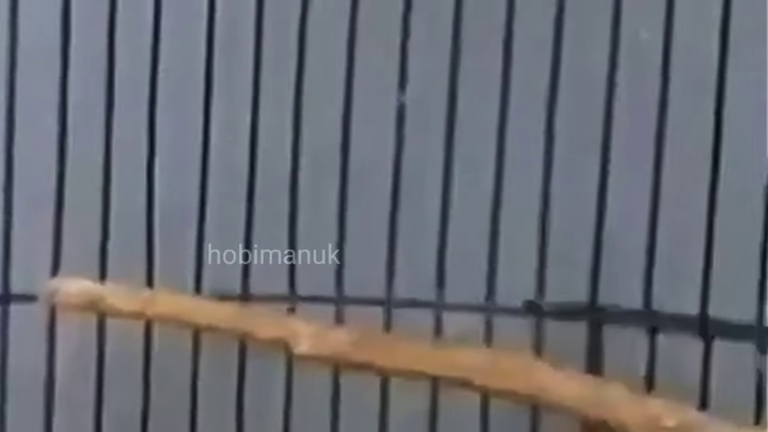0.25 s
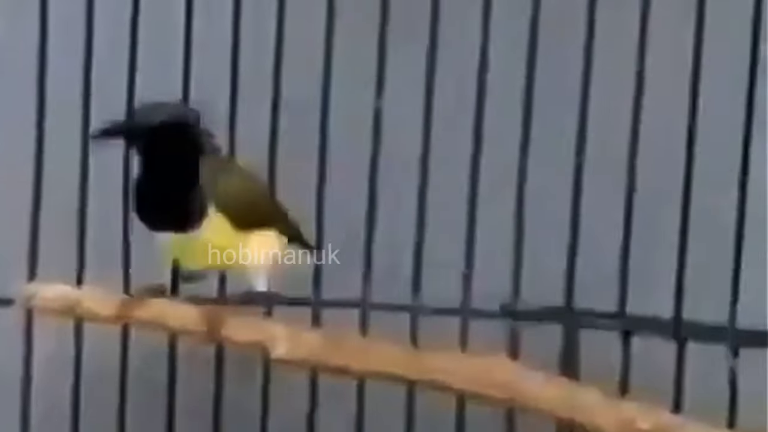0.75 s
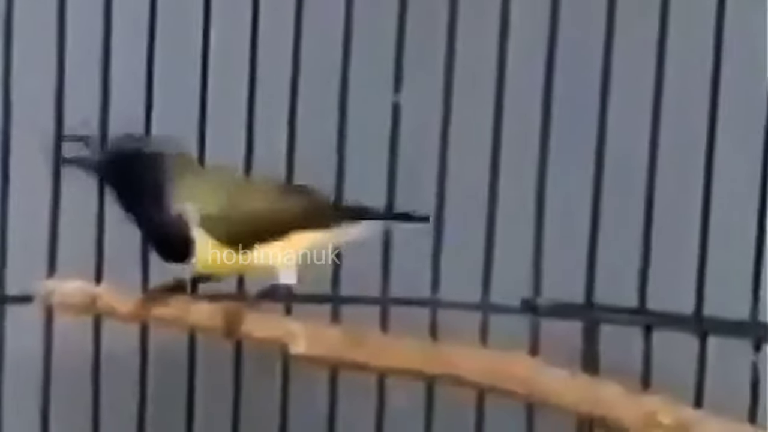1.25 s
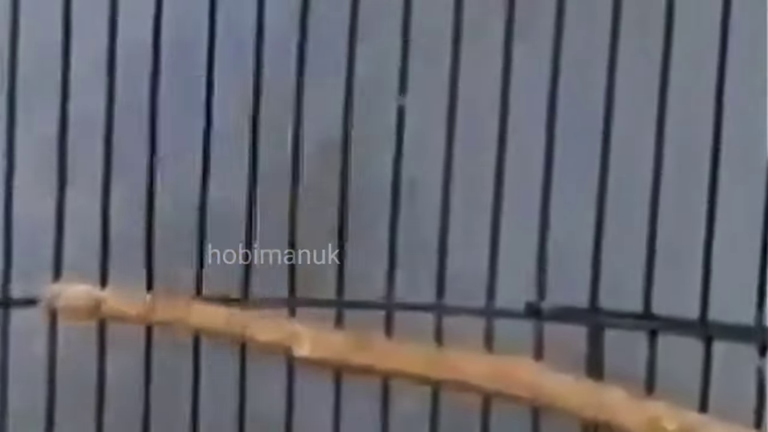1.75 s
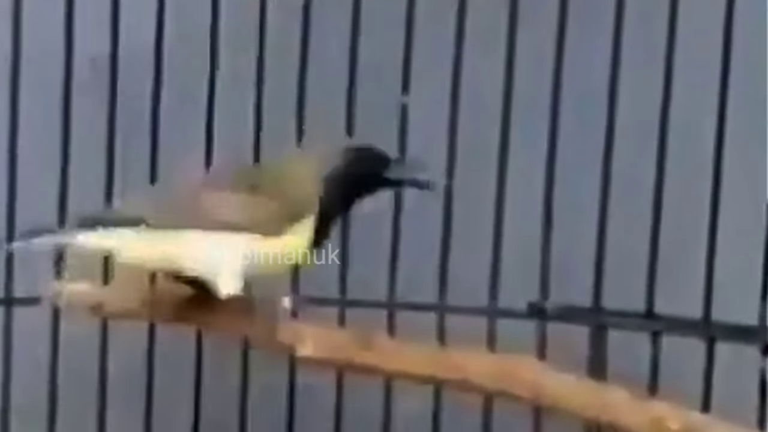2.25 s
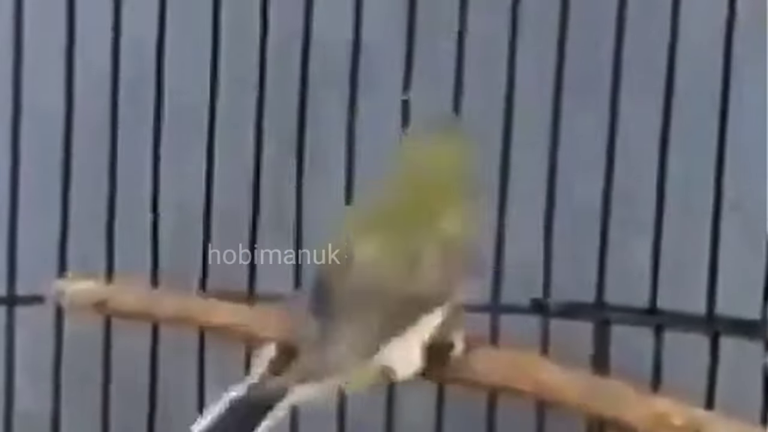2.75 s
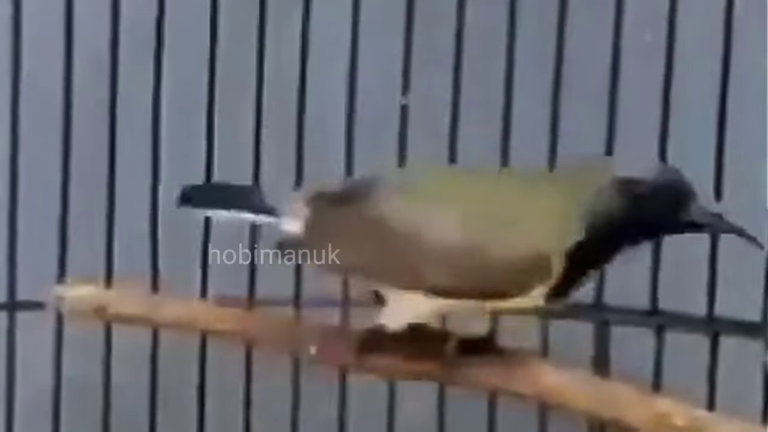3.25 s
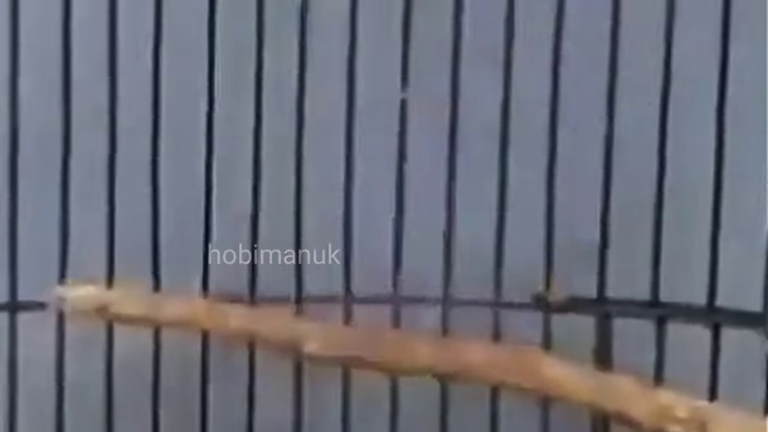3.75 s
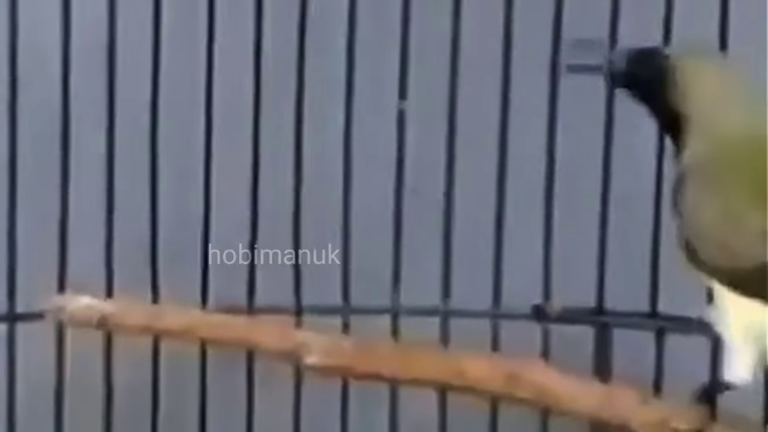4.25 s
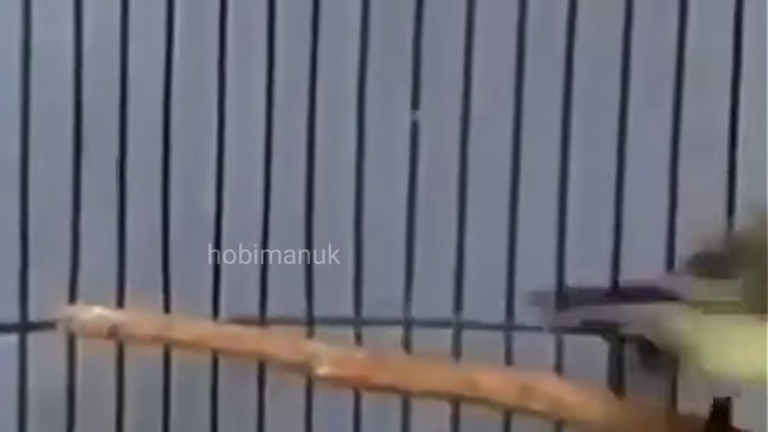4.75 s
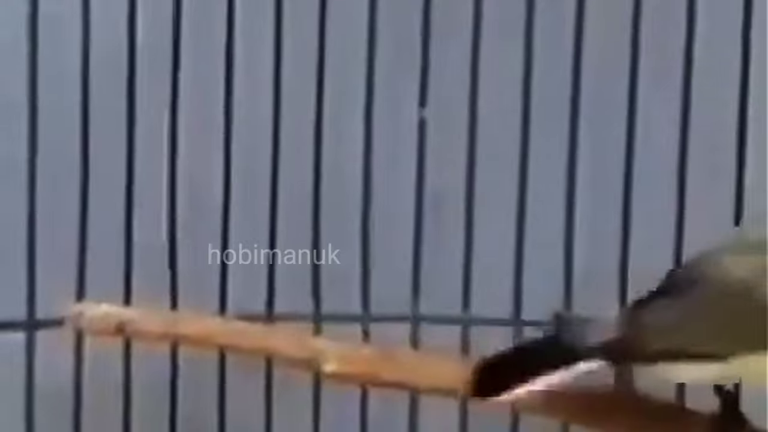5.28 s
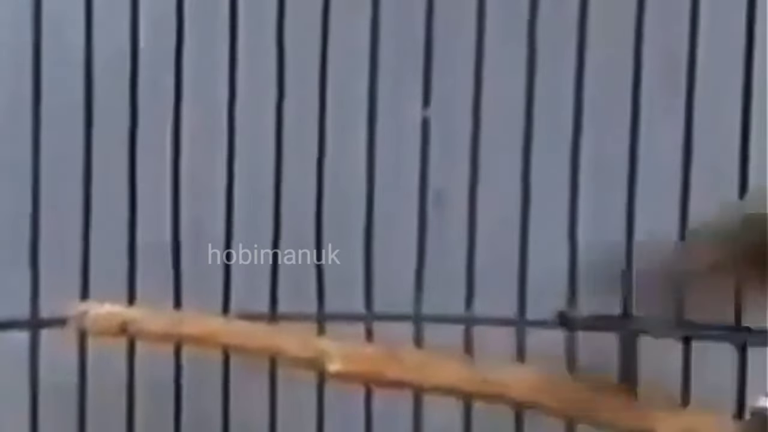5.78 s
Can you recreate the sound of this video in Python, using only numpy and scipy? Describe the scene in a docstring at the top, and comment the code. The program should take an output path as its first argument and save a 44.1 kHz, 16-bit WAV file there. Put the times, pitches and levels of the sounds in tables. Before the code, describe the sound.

A small caged sunbird sings close to the microphone in a hard-walled room, over low rumble, faint hum and light hiss. A wing whirr and faint rasp open at 0 s, then hoarse rasps and clear pips tumble together until about 0.6, loudest near 0.35. A sharp rising chip comes at 1.1, a rasp at 1.5, then three quick chips from 1.6 to 1.85, a raspy warble at 1.9 and another chip at 2.05. At 2.55 and again, louder, at 3.1, rapid pips lead into a short arched trilled whistle. Soft wing puffs and claw taps on the perch surround these, notably around 2.4-3.1 and 4.1. From 3.3 distant birds whistle clearly, stepping downward until about 4; two echoing cascades of falling chirps come at 4.5 and 4.75. Single bright close chips ring out at 4.1, 5.0 and 5.8, among faint far chirps.

```python
"""A whirr of wings and a faint hoarse rasp come first, then a caged sunbird sings close to the microphone.
Its rasps, pips, arched whistles and sharp chips are near sines, shaken in pitch and roughened into chaos.
Its wings puff coloured noise, and its feet scrape noise onto a ringing perch as it hops about.
Further off, other birds whistle and chirp in plain sines, mostly heard through the echo of a hard-walled
room. Shaped noise and steady sines make a low rumble, a hum and a faint hiss underneath."""
import sys
import numpy as np
from scipy import signal
from scipy.fft import rfft, irfft
from scipy.io import wavfile
from scipy.ndimage import uniform_filter1d, minimum_filter1d, map_coordinates

SR = 44100
rng = np.random.default_rng(int(sys.argv[2]) if len(sys.argv) > 2 else 0)


def store_wav(level_fs):
    """Save 16-bit WAV to argv[1]."""
    pcm = np.round(np.clip(np.atleast_2d(level_fs), -1, 1) * 32767)
    wavfile.write(sys.argv[1], SR, pcm.T.astype(np.int16))


N = 265464
TIME = np.arange(N) / SR

# Song levels are set before echo and output gain; pitches before trill and jitter; roughness is capped at 1.
# hoarse rasps: (t/s, length/s, first f/Hz, middle f/Hz, last f/Hz, level/dB, crescendo/dB, roughness)
RASP_NOTES = [ (.001, 0.051, 2670, 3310, 2980, -30.5, -5, 0.47),
              (0.094, 0.083, 2097, 3730, 2864, -22, 3.5, 0.7),
              (0.228, 0.048, 4720, 3934, 3950, -25.5, 9, 0.94),
              (.319, 0.027, 4340, 5010, 4600, -8.5, 8, 0.5),
              (.328, 0.067, 3492, 4784, 5800, -7.5, 10, 0.78),
              (0.444, 0.033, 3410, 3730, 3150, -18.5, -8, 0.58),
              (0.52, 0.071, 4570, 4245, 4800, -20, 4.5, 1.1),
              (0.567, 0.048, 4900, 5404, 5040, -12.5, 1, 0.81),
              (1.482, 0.049, 3437, 3840, 3305, -20, -6, 0.9),
              (1.883, 0.095, 5366, 4965, 4650, -18.5, 0.5, 0.75),
              (2.545, 0.037, 4100, 3940, 4060, -28, 2, 0.86),
              (3.056, 0.044, 3610, 3860, 4010, -20.5, 9, 0.69), ]
# clear pips that snap onto a pitch; two overlap when both sides of the syrinx sound:
# (t/s, length/s, first f/Hz, held f/Hz, level/dB, roughness)
PIP_NOTES = [ (0.17, 0.014, 5800, 4900, -13.5, 0.1), (.257, 0.0085, 4370, 4870, -13.5, 0.78),
             (1.899, 0.0083, 5330, 5480, -10.5, 0.26), (1.912, 0.021, 4690, 4270, -14, 0),
             (1.914, 0.014, 6800, 6430, -8.5, 0.05), (1.935, .023, 4050, 5320, -8, 0.08),
             (2.567, .007, 4380, 4420, -12.5, 0), (2.581, 0.019, 5930, 4320, -11, 0.3),
             (2.599, 0.022, 6090, 5270, -17, 0.32), (3.089, 0.0087, 4870, 4120, 2.5, 0.27),
             (3.099, 0.02, 6860, 4590, -10, 0.37), (3.118, 0.023, 6860, 5180, -7.5, 0.25), ]
# arched, finely trilled whistles: (t/s, length/s, first f/Hz, middle f/Hz, last f/Hz, level/dB, crescendo/dB)
ARCH_NOTES = [(2.614, .098, 5530, 6290, 5760, -12, -4.5), (3.138, .134, 5380, 6460, 5240, -8, -6.5)]
# sharp rising chips: (t/s, length/s, first f/Hz, top f/Hz, level/dB, roughness)
CHIP_NOTES = [ (1.121, 0.057, 3535, 5540, -10.5, 0.78), (1.615, 0.05, 4150, 6070, -7.5, 0.91),
              (1.717, 0.047, 4190, 6230, -4.5, 0.76), (1.812, 0.048, 4100, 5965, -8, 0.79),
              (2.049, 0.065, 3650, 6140, -11.5, 1.02), (4.128, 0.051, 4204, 5630, -6.5, 0.71),
              (5.021, 0.051, 3850, 6014, -2, 0.65), (5.776, 0.057, 3560, 6500, -4, 0.63), ]
# balance let through by throat and open beak, before the note is levelled: (f/Hz, relative level/dB)
BEAK_RESPONSE = [(1400, -29), (2800, -8), (4000, -1.5), (5500, 9.5), (6600, 7), (7400, -16.5),
                 (9000, -20.5), (12000, -23)]
# colour of the turbulence in a rough note: (f/Hz, relative level/dB)
TURBULENCE_COLOUR = [(300, -28.5), (1200, -10.5), (2600, -7), (4500, 6), (6600, 3), (7500, -7),
                     (9000, -23.5), (12000, -32.5)]
# reflections from the cage tray and the wall behind it: (delay/s, level/dB)
NEAR_REFLECTIONS = [(.0013, -14), (.0034, -12), (.0071, -16), (.0118, -22)]

# bursts of wingbeats: (t/s, length/s, level/dB)
WING_BURSTS = [(0, 0.043, -26), (0.135, 0.078, -41), (0.37, 0.082, -33.5), (1.025, .15, -39.5),
               (2.251, 0.044, -38), (2.421, 0.058, -47.5), (2.538, 0.083, -43.5), (2.931, 0.067, -37),
               (3.06, 0.16, -38.5), (3.451, 0.032, -52), (4.064, 0.073, -32), (4.365, 0.075, -39)]
# colour of the air pushed by a wing: (f/Hz, relative level/dB)
WING_COLOUR = [(20, -4.5), (40, -14), (90, 5), (180, -14), (350, -19.5), (900, -25.5), (2500, -19),
               (7000, -30.5), (12000, -59)]
# feet on perch and bars: (t/s, level/dB)
FOOT_TAPS = [(0.031, -47), (.434, -37.5), (1.57, -44.5), (2.436, -42.5), (2.931, -39), (2.96, -35.5),
             (3.079, -34.5), (4.084, -33.5), (4.391, -44)]
# ringing modes of the perch in its cage: (f/Hz, relative level/dB, t60/s)
PERCH_MODES = [(620, 1, 0.015), (758, -12, 0.075), (960, 6.5, 0.012), (1218, 2, 0.013), (1820, -1.5, 0.02),
               (2966, -10, 0.009)]

# Levels of the distant birds are set before the direct and echo trims.
# pure whistles of a bird further off: (t/s, length/s, first f/Hz, held f/Hz, level/dB)
FAR_WHISTLES = [ (0.599, 0.079, 2145, 2136, -37.5), (0.673, 0.031, 2740, 2800, -44),
                (0.816, 0.048, 2104, 2410, -39.5), (0.894, .055, 2944, 2520, -41),
                (1.074, .089, 2173, 2088, -43.5), (1.409, 0.12, 2130, 2660, -45.5),
                (3.266, 0.036, 5680, 5620, -19), (3.281, 0.049, 2156, 2185, -41.5),
                (3.311, 0.087, 2856, 2660, -40.5), (3.356, 0.14, 4366, 4499, -14.5),
                (3.557, 0.13, 3646, 3502, -18.5), (3.743, 0.076, 2034, 2197, -41.5),
                (3.754, 0.15, 2948, 2845, -22), (3.916, 0.175, 3365, 3080, -22.5),
                (4.105, 0.12, 2340, 2415, -37.5), (4.301, .135, 2597, 2674, -29.5),
                (4.504, 0.052, 4150, 4130, -41), (4.642, 0.028, 3810, 4120, -20),
                (4.951, 0.081, 2360, 2280, -32), (5.09, 0.05, 2567, 2330, -40.5),
                (5.65, 0.13, 4300, 4580, -32.5), ]
# slurred chirps from across the room: (t/s, length/s, sweep/octaves, level/dB)
FAR_SLURS = [ (0.202, .025, -0.46, -29), (0.285, 0.013, -1.4, -24), (0.965, 0.012, 0.66, -31.5),
             (1.043, 0.011, -0.8, -30.5), (2.245, 0.008, -.5, -30.5), (2.355, 0.0067, -0.94, -31.5),
             (2.425, 0.011, -0.87, -32), (2.507, 0.021, -0.89, -31), (2.727, 0.052, -1, -32.5),
             (2.923, 0.015, -0.56, -24), (2.985, 0.023, -0.81, -27.5), (3.403, 0.043, 0.68, -30.5),
             (3.481, 0.046, -1.12, -32), (3.906, 0.026, 0.74, -33.5), (3.971, 0.02, 0.74, -29.5),
             (4.044, 0.038, -0.88, -33), (4.267, 0.16, -0.77, -41.5), (4.418, 0.012, 1.1, -33),
             (5.145, .036, -0.75, -39), (5.341, 0.023, -1.07, -34.5), (5.41, 0.013, -0.8, -37),
             (5.518, 0.018, 0.65, -31.5), (5.598, 0.018, 0.7, -32), (5.689, 0.016, -0.55, -26),
             (5.975, 0.026, 0.7, -31.5), ]
CHIRP_MIDDLE_HZ = 4750  # every single slur sweeps through this pitch
# cascades of falling slurs: (t/s, top f/Hz, foot of first slur f/Hz, slur spacing/s, level/dB)
FAR_CASCADES = [(4.509, 6310, 4740, 0.036, -14.5), (4.731, 6705, 5130, .045, -13.5)]

# spectrum of the background noise: (f/Hz, relative density/dB)
FLOOR_COLOUR = [(20, -21), (45, -7.5), (85, 4), (160, -3.5), (260, -10.5), (550, -14), (1200, -19.5),
                (2400, -15), (4500, -14.5), (6500, -34.5), (8000, -28)]
FLOOR_DB = -43.5
# swell of the rumble, used about its median and then scaled: (t/s, level/dB)
RUMBLE_SWELL = [(0.0, -35), (0.52, -43), (1.568, -50.5), (4.019, -40.5), (4.11, -46), (6.02, -47)]
# steady hum, before a common trim: (f/Hz, level/dB)
HUM_TONES = [(82, -57), (344.5, -62.5), (522, -70), (603, -63)]
# colour of the microphone hiss: (f/Hz, relative density/dB)
HISS_COLOUR = [(1000, -28), (7500, -52), (10000, -2.5), (15000, -13.5)]
TOP_HZ = 15600  # upper limit of the output


def sunbird(echo_db=-18, scatter_db=-12, side_db=-16):
    """The close song, coloured by the nearest surfaces and followed by the room's echo."""
    song = rasps() + pips() + arches() + chips()
    near, side = song.copy(), np.zeros(N)
    for delay, db in NEAR_REFLECTIONS:
        add(near, delay, undb(db) * song)
    # a reflection from one side reaches the two ports unequally, the more so the higher the pitch
    sideways = colour(song, [(2500, -12), (5500, 0)])
    add(side, .0022, undb(side_db) * sideways)
    bars = room(undb(scatter_db) * song, t60=.06, side_db=-12, build_s=.001)
    echo = room(undb(echo_db) * song, t60=.55, side_db=-12, build_s=.012)
    return stereo(near, side) + bars + echo


def rasps():
    """Hoarse notes on a bowed pitch, shaken hard and fast, with a strong line an octave below."""
    out = np.zeros(N)
    for start, length, first, middle, last, db, crescendo, rough in RASP_NOTES:
        t = TIME[:int(length * SR)]
        hz = bow(len(t), first, middle, last)
        level = db + contour(t, attack_s=0.013, release_s=.01, crescendo_db=crescendo)
        note = syrinx(hz, level, rough, trill_hz=230.2, trill_depth=0.12, jitter=0.102,
                      rasp_db=-7.5, pulse_db=-0.5, undertone_db=-2)
        add(out, start, note)
    return out


def pips():
    """Brief notes that snap onto their pitch; strung together they warble or lead into an arch."""
    out = np.zeros(N)
    for start, length, first, held, db, rough in PIP_NOTES:
        t = TIME[:int(length * SR)]
        hz = settle(t, first, held, settle_s=0.00526)
        level = db + contour(t, attack_s=0.0024, release_s=0.0032, crescendo_db=2.5)
        note = syrinx(hz, level, rough, trill_hz=143.5, trill_depth=0.082, jitter=0.12,
                      rasp_db=-2.5, overtone_db=-5)
        add(out, start, note)
    return out


def arches(rough=0.25, offset_hz=3870, offset_db=-33):
    """Long whistles that rise and fall with a fine trill."""
    out = np.zeros(N)
    for start, length, first, middle, last, db, crescendo in ARCH_NOTES:
        t = TIME[:int(length * SR)]
        hz = bow(len(t), first, middle, last)
        level = db + contour(t, attack_s=0.0053, release_s=0.012, crescendo_db=crescendo)
        note = syrinx(hz, level, rough, trill_hz=182, trill_depth=0.15, jitter=0.07,
                      rasp_db=-0.5, overtone_db=-10.5)
        add(out, start, note)
        # not part of the bird's voice: a very quiet, wavering sine at the pitch less offset_hz
        offset_sine = unit(sine((hz - offset_hz) * (1 + 0.071 * wander(len(t), 500))))
        add(out, start, undb(level + offset_db) * offset_sine)
    return out


def chips(crest_share=.78, clearing=0.68):
    """Each chip sweeps up, tips over just before its end, and loses roughness as it goes."""
    out = np.zeros(N)
    for start, length, first, top, db, rough in CHIP_NOTES:
        t = TIME[:int(length * SR)]
        hz = first + (top - first) * np.sin(np.pi / 2 * t / (crest_share * length)) ** 2
        level = db + contour(t, attack_s=0.02, release_s=0.016, crescendo_db=15.0, depth_db=22.5)
        clearing_rough = rough * (1 - clearing * t / length)
        note = syrinx(hz, level, clearing_rough, trill_hz=145.2, trill_depth=0.2, jitter=0.16,
                      rasp_db=-6.5, pulse_db=1.5)
        add(out, start, note)
    return out


def syrinx(hz, db, rough, trill_hz, trill_depth, jitter, rasp_db, pulse_db=0, jitter_hz=1100,
           overtone_db=-3, undertone_db=-9, shimmer_db=4.0):
    """One note: a near sine with a quick pitch shake; when rough it turns chaotic and grows overtones."""
    rough, size = np.clip(rough, 0, 1), len(hz)
    uneven_trill_hz = trill_hz * (1 + 0.168 * wander(size, 89.1))
    trill = sine(uneven_trill_hz)
    hz = hz * (1 + rough * (trill_depth * trill + jitter * wander(size, jitter_hz)))
    phase = 2 * np.pi * np.cumsum(hz) / SR
    # strong and weak cycles alternate in a rough note, adding a line an octave below
    overtone = undb(overtone_db) * np.sin(2 * phase)
    undertone = undb(undertone_db) * rough * np.sin(phase / 2)
    tone = colour(np.sin(phase) + rough * (overtone + undertone), BEAK_RESPONSE)
    # even out the running level
    tone /= np.sqrt(uniform_filter1d(tone ** 2, size=300) + 1e-9)
    # turbulence at the membranes fills in between the partials
    turbulence = unit(colour(noise(size), TURBULENCE_COLOUR))
    tone += undb(rasp_db) * rough ** 2 * turbulence
    level = db + pulse_db * trill + shimmer_db * rough * wander(size, 450)
    return tone * undb(level) * fade(size, .002)


def wings(beat_hz=35):
    """A puff of air at each downstroke, over a steadier rush through the burst."""
    force = np.zeros(N)
    for start, length, db in WING_BURSTS:
        t = TIME[:int(length * SR)]
        strokes = .45 + np.sin(np.pi * beat_hz * t + np.pi / 4) ** 4
        add(force, start, undb(db) * unit(strokes * fade(len(t), 0.0094)))
    air = unit(colour(rng.standard_normal(N), WING_COLOUR))
    return force * air


def feet(scratch_s=0.0098):
    """Claws scrape briefly and set the perch ringing in its decaying modes."""
    out, t = np.zeros(N), TIME[:SR // 10]
    ring = sum(undb(db - 60 * t / t60) * np.sin(2 * np.pi * hz * t) for hz, db, t60 in PERCH_MODES)
    for start, db in FOOT_TAPS:
        scrape = noise(len(t)) * np.exp(-t / scratch_s)
        knock = signal.fftconvolve(scrape, ring)
        # the level refers to the first 10 ms
        add(out, start, undb(db) * knock / np.std(knock[:SR // 100]))
    return out


def whistler(settle_s=0.0305, waver=0.0071, faint_waver=0.019, direct_db=-4, echo_db=-2):
    """Sines slide onto a pitch and hold it, the faint ones less steadily; the room draws them out."""
    out = np.zeros(N)
    for start, length, first, held, db in FAR_WHISTLES:
        t = TIME[:int(length * SR)]
        unsteady = np.interp(db, [-42, -25], [faint_waver, waver])
        hz = settle(t, first, held, settle_s) * (1 + unsteady * wander(len(t), 169.7))
        add(out, start, undb(db) * unit(sine(hz) * fade(len(t), 0.035)))
    return undb(direct_db) * out + room(undb(echo_db) * out, t60=.5, side_db=-30, build_s=.008)


def far_chirps(scratch=0.1, direct_db=-9, echo_db=2, cascade_direct_db=-3, cascade_db=-1):
    """Single slurs and cascades that the room smears into a sizzle."""
    single, falling = np.zeros(N), undb(cascade_db) * cascades()
    for start, length, sweep, db in FAR_SLURS:
        half = 2 ** (sweep / 2)
        chirp = slur(length, CHIRP_MIDDLE_HZ / half, CHIRP_MIDDLE_HZ * half, scratch)
        add(single, start, undb(db) * chirp)
    direct = undb(direct_db) * single + undb(cascade_direct_db) * falling
    echo = room(undb(echo_db) * (single + falling), t60=.5, side_db=-14, build_s=.003)
    return direct + echo


def cascades(lead_s=0.032, lead_db=-8, lead_sag=0.046, slur_s=0.028, foot_hz=4250, fading_db=6, count=3):
    """A soft high lead-in breaks into falling slurs that reach ever lower and die away."""
    out = np.zeros(N)
    for start, top, first_foot, spacing, db in FAR_CASCADES:
        brink = top * (1 - lead_sag)
        add(out, start, undb(db + lead_db) * slur(lead_s, top, brink, scratch=0.0065))
        for k, late in enumerate(np.linspace(0, 1, count)):
            foot = first_foot + (foot_hz - first_foot) * np.sqrt(late)
            fall = slur(slur_s, brink, foot, scratch=0.032)
            add(out, start + lead_s + k * spacing, undb(db - fading_db * late ** 2) * fall)
    return out


def slur(length, first, last, scratch):
    """A quick, slightly scratchy glide between two pitches."""
    size = int(length * SR)
    hz = np.geomspace(first, last, size) * (1 + scratch * wander(size, 1208))
    return unit(sine(hz) * fade(size, .004))


def room(x, t60, side_db, build_s):
    """Diffuse echo that builds up and dies away; the two close ports hear nearly the same."""
    t = TIME[:SR]
    envelope = undb(-60 * t / t60) * (1 - np.exp(-t / build_s))
    tails = rng.standard_normal((2, SR)) * envelope
    mid, side = (signal.fftconvolve(x, h / np.linalg.norm(h))[:N] for h in tails)
    return stereo(mid, undb(side_db) * side)


def background(flicker_db=2, swell=0.62, hum_db=-2, hiss_db=-54):
    """Shaped noise rumbles under wavering sines, common to both ports; the hiss is each port's own."""
    mid, side = (unit(colour(x, FLOOR_COLOUR)) for x in rng.standard_normal((2, N)))
    side = colour(side, [(100, -21), (500, -17.5), (1200, -10.0), (5000, -6)])
    times, db = np.transpose(RUMBLE_SWELL)
    swell_db = swell * np.interp(TIME, times, db - np.median(db))
    # the low octaves swell together and flicker each on its own
    rumble = np.zeros(N)
    for edge_hz in 100 * 2 ** np.arange(5):
        band = colour(mid, [(edge_hz, 0), (edge_hz * np.sqrt(2), -60)])
        mid = mid - band  # what is left above this band
        rumble += band * undb(swell_db + flicker_db * wander(N, 19.0))
    hum = np.zeros(N)
    for hz, db in HUM_TONES:
        level = undb(db + hum_db + 0.7 * wander(N, 9.5))
        hum += level * unit(np.sin(2 * np.pi * hz * TIME + 2 * wander(N, 8.6)))
    hiss = unit(colour(rng.standard_normal((2, N)), HISS_COLOUR))
    return undb(FLOOR_DB) * stereo(mid + rumble, side) + hum + undb(hiss_db) * hiss


def undb(db):
    """Decibels to gain."""
    return 10 ** (np.asarray(db) / 20)


def unit(x):
    """Scale to rms 1."""
    return x / np.sqrt(np.mean(x ** 2) + 1e-18)


def sine(hz):
    """A sine that follows a moving pitch."""
    return np.sin(2 * np.pi * np.cumsum(hz) / SR)


def noise(size):
    """Up to half a second of white noise."""
    return rng.standard_normal(SR // 2)[:size]


def response(hz, points):
    """Gain of a (f/Hz, level/dB) outline at the given frequencies, drawn on a log pitch axis."""
    f, db = np.transpose(points)
    return undb(np.interp(np.log(np.maximum(hz, 1)), np.log(f), db))


def colour(x, points):
    """Filter by a (f/Hz, level/dB) outline."""
    size = x.shape[-1]
    return irfft(rfft(x) * response(np.fft.rfftfreq(size, 1 / SR), points), size)


def wander(size, rate):
    """Smooth random motion with a spread near 1, through rate random points a second."""
    points = rng.standard_normal(1024)
    return map_coordinates(points, [np.arange(size) / SR * rate], order=2, mode="wrap")


def bow(size, first, middle, last):
    """A parabola through three pitches."""
    curve = np.polyfit([-1, 0, 1], [first, middle, last], 2)
    return np.polyval(curve, np.linspace(-1, 1, size))


def settle(t, first, held, settle_s):
    """A pitch that slides onto a held value."""
    return held + (first - held) * np.exp(-t / settle_s)


def contour(t, attack_s, release_s, crescendo_db=0, depth_db=20):
    """Level in dB of a note: attack, a hold that may grow or sink, release."""
    attack = np.maximum(1 - t / attack_s, 0)
    release = np.maximum(1 - (t[-1] - t) / release_s, 0)
    return crescendo_db * (t / t[-1] - .5) - depth_db * (attack + release)


def fade(size, edge_s):
    """A flat envelope with rounded ends."""
    return signal.windows.tukey(size, min(2 * edge_s * SR / size, 1))


def add(out, start, x):
    """Mix x into out from the given time on."""
    i = max(int(start * SR), 0)
    x = x[:max(N - i, 0)]
    out[i:i + len(x)] += x


def stereo(mid, side):
    """Left and right from mid and side."""
    return np.array([mid + side, mid - side])


def scene():
    """All the birds, the movements in the cage and the room."""
    movement = wings() + feet()
    movement_echo = undb(-4) * room(movement, t60=0.14, side_db=-42.0, build_s=0.0029)
    return sunbird() + movement + movement_echo + whistler() + far_chirps() + background()


def record(dry, makeup_db=2.0, duck=1.77, recover_s=0.19):
    """Gain control sinks a little after loud calls, a fast limiter holds their peaks, and the top is cut."""
    keep = np.exp(-1 / (recover_s * SR))
    # the left channel steers the gain of both
    loudness = np.sqrt(signal.lfilter([1 - keep], [1, -keep], dry[0] ** 2))
    ridden = undb(makeup_db) * dry / (1 + duck * loudness)
    gain = np.minimum(1, 1 / (np.abs(ridden).max(axis=0) + 1e-9))
    gain = uniform_filter1d(minimum_filter1d(gain, size=41), size=41)
    top_cut = signal.ellip(8, .1, 70, TOP_HZ, fs=SR, output="sos")
    return signal.sosfilt(top_cut, ridden * gain)


dry = scene()
out = record(dry)
store_wav(out)
```